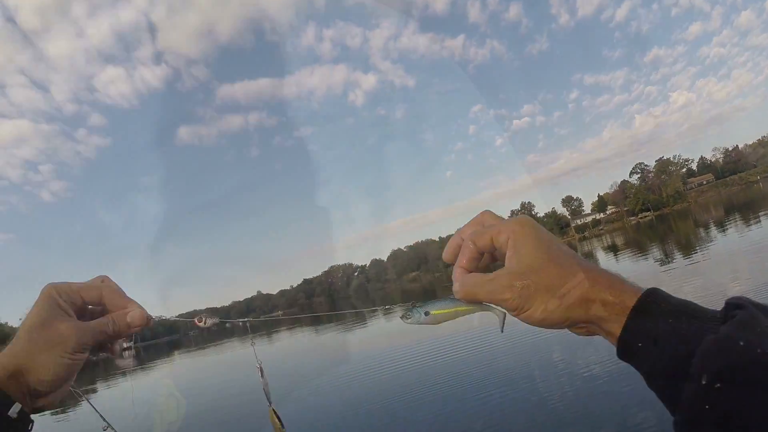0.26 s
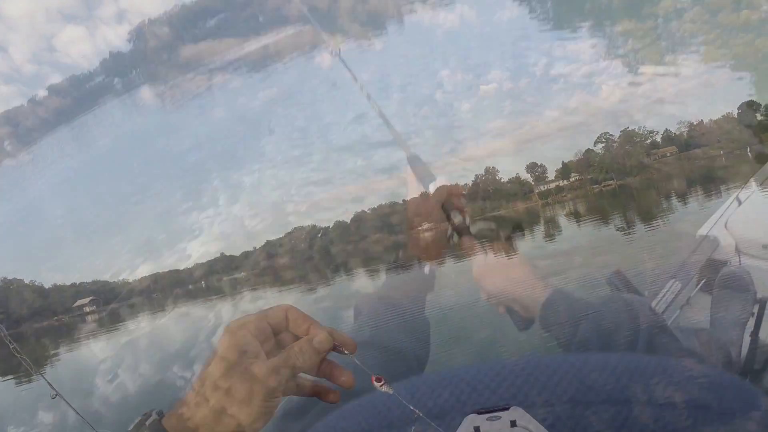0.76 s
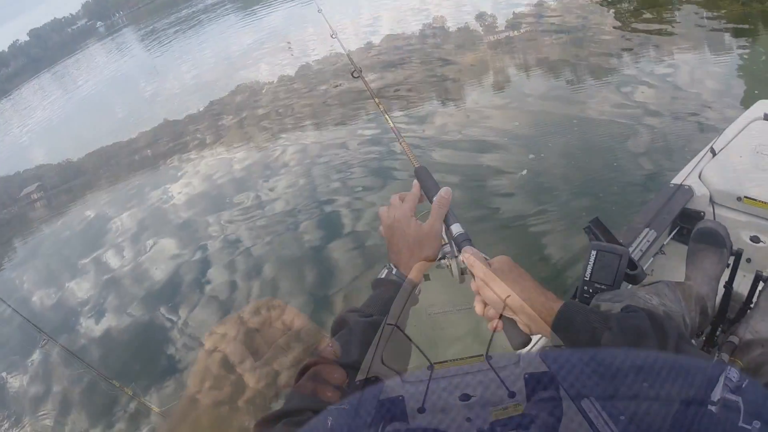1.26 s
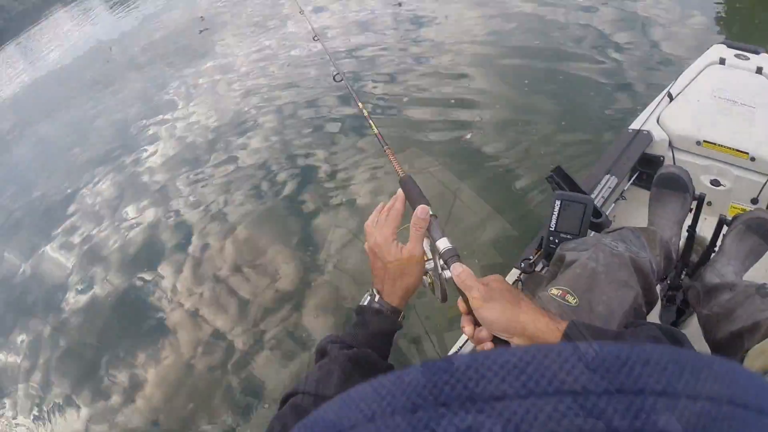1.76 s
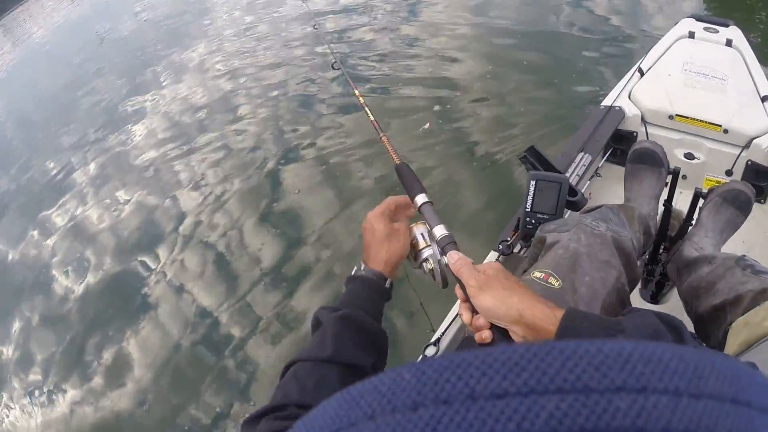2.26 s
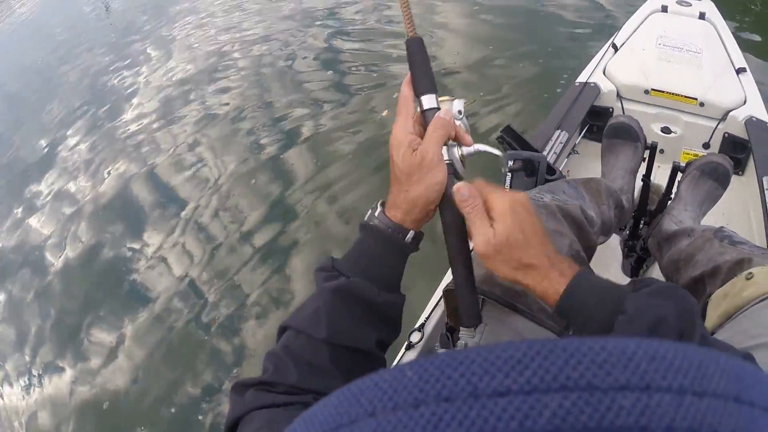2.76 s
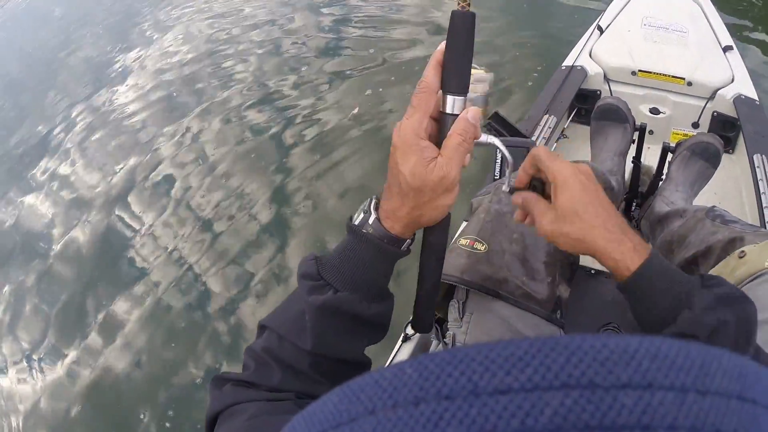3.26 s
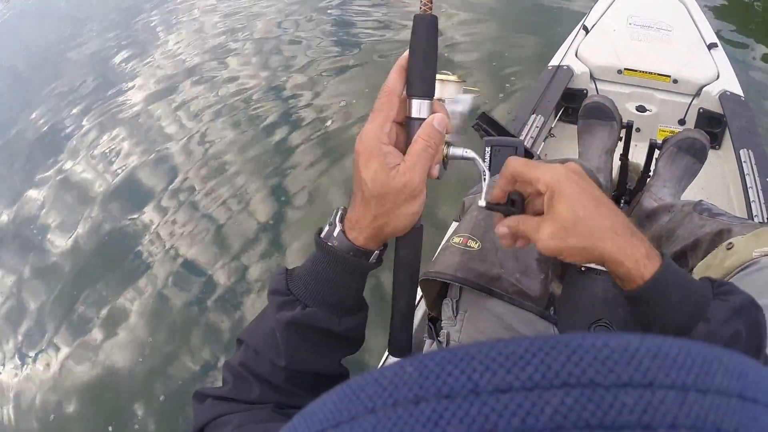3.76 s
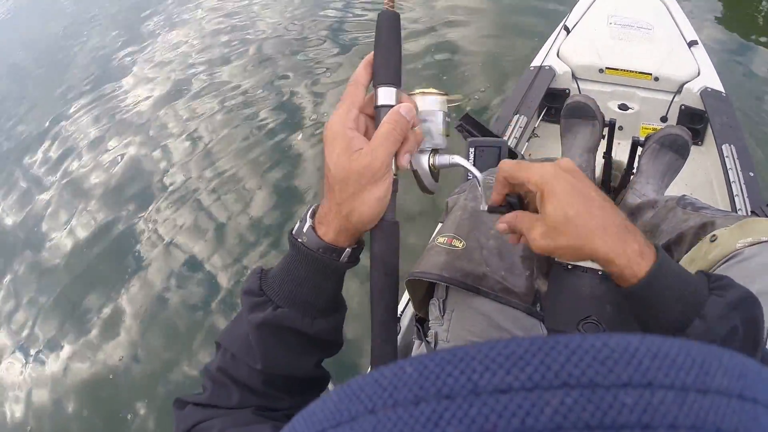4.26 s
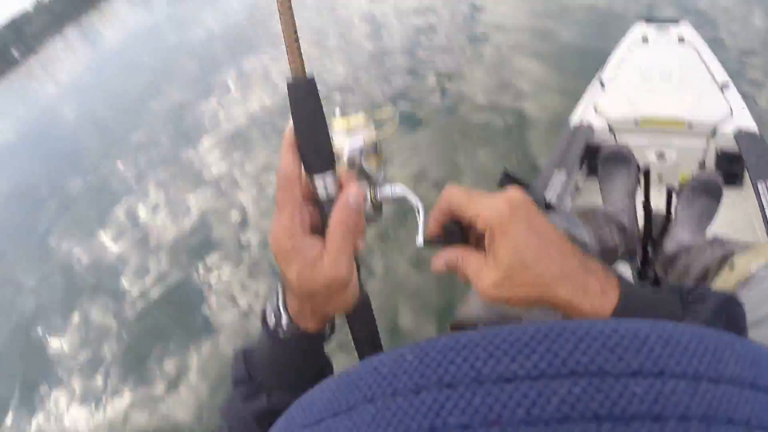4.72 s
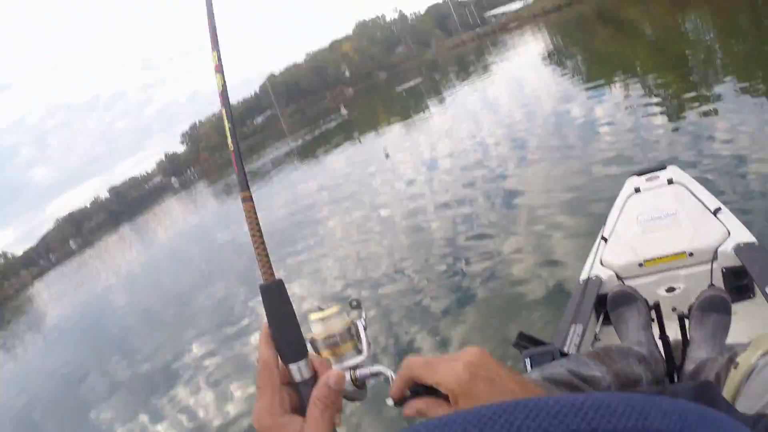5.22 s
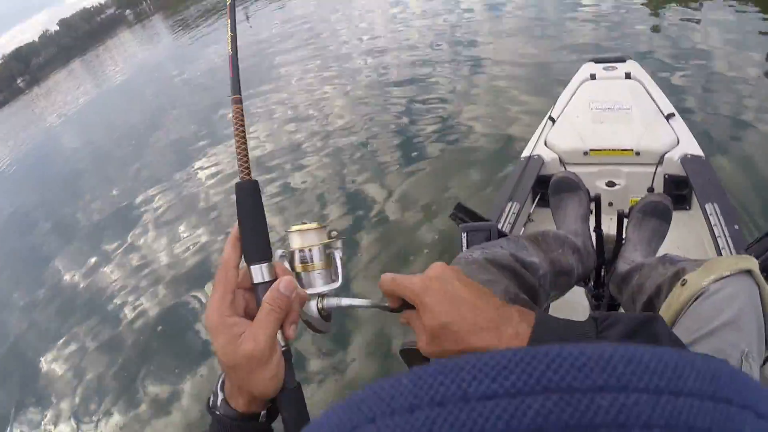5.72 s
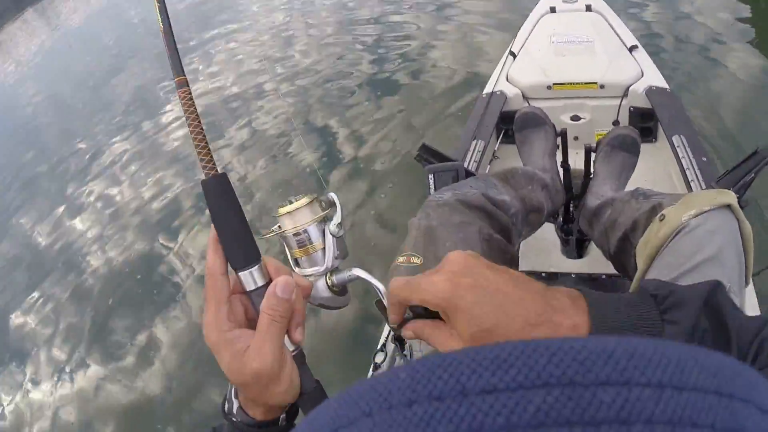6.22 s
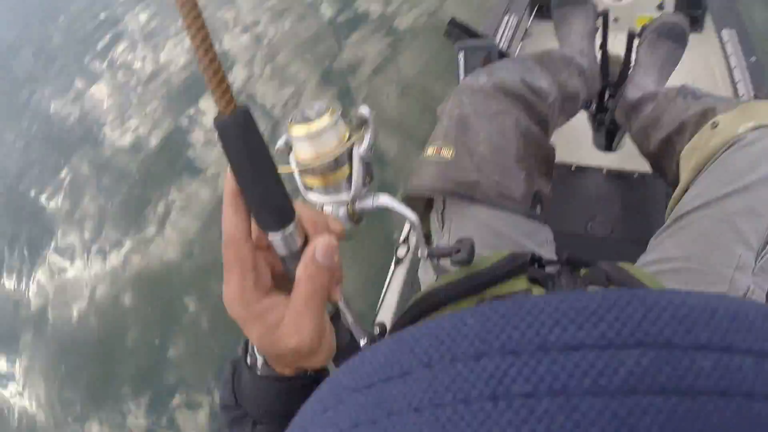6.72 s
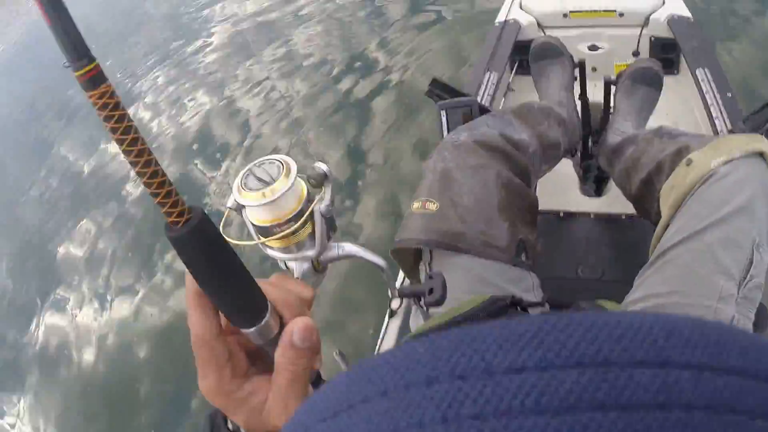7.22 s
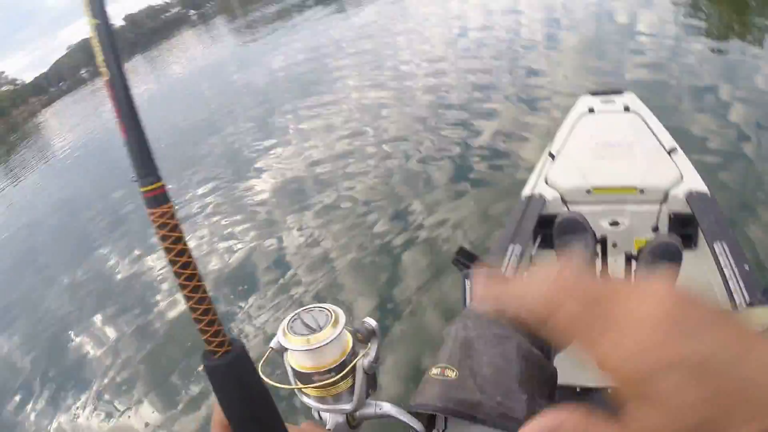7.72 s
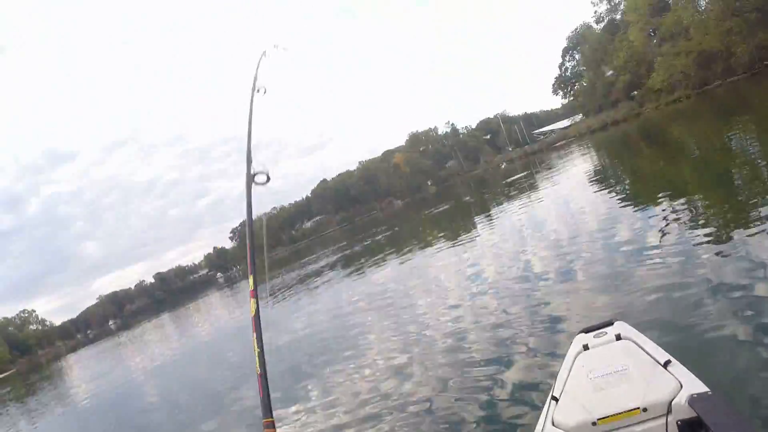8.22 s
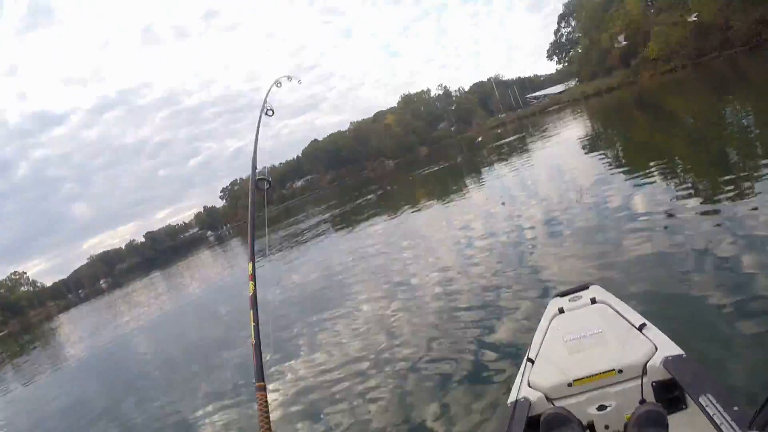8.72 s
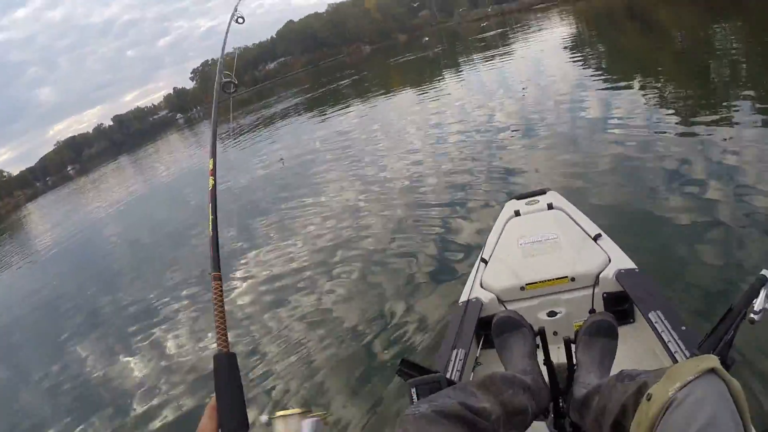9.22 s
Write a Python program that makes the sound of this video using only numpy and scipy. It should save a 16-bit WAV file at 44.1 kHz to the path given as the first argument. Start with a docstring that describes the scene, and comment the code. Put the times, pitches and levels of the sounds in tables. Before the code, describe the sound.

Calm open water, heard from a body-worn, enclosed microphone with low steady hiss. Distant birds whistle and peep with a slight echo from the banks, while a cricket trills and a katydid rasps in bouts. Close plastic knocks come sparsely, then in a short cluster, then as a violent burst of bumps, scrapes and deep membrane thuds. The hiss briefly dips, and faint taps and birds continue.

```python
"""An angler's chest camera in its plastic housing, on a kayak: a cricket, pulsed tone, trills over hiss throughout.
A katydid, gated noise, rasps in three bouts from the start; far birds, gliding tones, whistle from 0.5 s on.
Early knocks ring the housing, one hard at 1.6 s; thin ticks and a nasal call follow, then knocks near 4.9 s.
From 6.6 to 7.7 s strap, jacket and hand clatter, rub and squeak on it, and jolts push the microphone membrane.
The hiss dips just after; lighter knocks and rubs, birds and the katydid go on to the end."""
import sys
import numpy as np
from scipy import signal
from scipy.fft import rfft, irfft
from scipy.io import wavfile

SR = 44100
rng = np.random.default_rng(int(sys.argv[2]) if len(sys.argv) > 2 else 0)


def bounce(signal):
    """Save signal as a 16-bit WAV file at the path given by the first command-line argument."""
    frames = np.transpose(np.atleast_2d(signal))
    limited = np.clip(frames, -1, 1)
    pcm = np.round(limited * 32767).astype(np.int16)
    wavfile.write(sys.argv[1], SR, pcm)


N = 418068   # length in samples

# how loud the steady sounds are over time: t/s, hiss level/dB, body rumble level/dB, cloth rustle level/dB
BACKGROUND_LEVELS = [(0.0, -59.5, -75, -102), (0.45, -60, -49.5, -66.5), (0.84, -63, -81.5, -71.5),
                     (1.63, -67.5, -72, -77.5), (4.36, -68, -73, -81.5), (4.94, -65.5, -54.5, -75.5),
                     (5.28, -66.5, -65, -68.5), (6.28, -66.5, -66.5, -74), (6.62, -64.5, -60.5, -63.5),
                     (6.76, -61.5, -42, -59.5), (7.44, -68, -48.5, -68.5), (7.71, -77, -71.5, -85.5),
                     (8.29, -65.5, -68.5, -69.5), (9.48, -67, -69, -74)]
# tone colour of the hiss: f/Hz, relative level/dB
HISS_COLOUR = [(12, -33.5), (20, -4), (161, -4), (404, -9.5), (465, -11), (985, -15), (4430, -22.5),
               (7310, -26), (7950, -26), (8880, -29), (13900, -36), (15500, -62)]
# ringing pitches (modes) of the housing: f/Hz, relative level/dB, time to fade by 60 dB/s
HOUSING_MODES = [(740, -21.5, 0.0073), (1300, -6.5, 0.004), (1456, 5, 0.012), (1643, -7.5, 0.024),
                 (2000, 4.5, 0.0057), (2350, -4, 0.016), (2582, 0.5, 0.012), (3316, 6.5, 0.0042),
                 (3700, -2.5, 0.0093), (4900, -8, 0.0071)]
# knocks on the housing: t/s, peak level of the ring/dB, favoured f/Hz
KNOCK_LIST = [(0.401, -35, 1280), (0.409, -33.5, 1470), (.4215, -50, 2580), (0.429, -40.5, 3430),
              (0.441, -37.5, 2470), (0.5356, -48, 1450), (0.543, -41, 1260), (.553, -49, 1400),
              (.748, -56, 2600), (0.853, -48.5, 1600), (1.585, -29, 1290), (1.6076, -15.5, 2370),
              (2.0158, -49.5, 1460), (2.4904, -34, 1620), (2.5182, -43, 2480), (4.5222, -49, 1130),
              (4.8594, -19.5, 1340), (4.871, -29, 2440), (4.879, -20.5, 2460), (4.89, -20, 1720),
              (4.905, -32, 1430), (5.5081, -42, 2450), (5.5804, -36.5, 2500), (5.5992, -47.5, 1550),
              (6.0558, -39.5, 2540), (6.322, -50, 3200), (6.6032, -15, 1550), (6.629, -17.5, 3150),
              (6.6405, -14.5, 2090), (6.67, -15, 1840), (6.6764, -15.5, 2670), (6.711, -23, 1920),
              (6.7563, -11.5, 1497), (6.762, -13, 1550), (6.791, -19, 2500), (6.8113, -29, 1930),
              (6.8718, -34.5, 2320), (6.8812, -38.5, 2080), (6.959, -29, 2200), (7.045, -43.5, 2630),
              (7.1598, -19.5, 1310), (7.22, -14.5, 4170), (7.2632, -7, 1930), (7.465, -29, 1920),
              (7.5008, -40.5, 1740), (7.612, -24.5, 1534), (7.6294, -18, 2440), (7.6431, -30.5, 1450),
              (7.9763, -34, 1420), (7.994, -36, 2060), (8.019, -31.5, 2530), (8.0406, -41, 2010),
              (8.1588, -43, 1420), (8.1772, -46.5, 1480), (8.396, -41.5, 1400), (8.4082, -39, 1540),
              (8.613, -45, 2000), (8.6463, -41.5, 1420), (8.7223, -46, 1505), (8.7546, -42.5, 2020),
              (8.989, -52, 2100), (9.238, -53, 2600), (9.3921, -38.5, 2430)]
# rubs along the housing: t/s, length/s, rms level of the ring/dB, treble hiss level relative to it/dB
RUB_LIST = [(0.461, 0.064, -56, -19), (1.576, 0.025, -47.5, -7.5), (4.745, 0.063, -60.5, -33),
            (4.877, 0.048, -42.5, -20), (4.924, 0.049, -41, -16.5), (4.971, 0.06, -58.5, -13),
            (5.153, 0.056, -65.5, -23), (5.32, 0.075, -59.5, -8.5), (5.684, 0.077, -63.5, -21),
            (6.599, 0.048, -34.5, -5), (6.645, 0.039, -31.5, -7.5), (6.666, 0.028, -27, -5.5),
            (6.687, 0.071, -34.5, -3), (6.748, 0.026, -33.5, 0.5), (6.804, 0.028, -43, -6),
            (7.063, 0.1, -49.5, -5), (7.178, 0.028, -35.5, -8), (7.202, 0.048, -31, -4.5),
            (7.261, 0.073, -57.5, -13.5), (7.337, 0.063, -53, -10.5), (7.397, 0.046, -47, -13),
            (7.501, 0.044, -54.5, -12.5), (7.598, 0.042, -55, -7.5), (7.628, 0.025, -41.5, -2),
            (8.006, 0.11, -58.5, -15), (8.602, 0.1, -60, -28), (8.843, 0.081, -65.5, -16),
            (9.14, .11, -66.5, -14)]
# jolts that push the membrane: t/s, peak level of the swing/dB, swing f/Hz,
# fade length/swings (a larger number lasts longer)
JOLT_LIST = [(0.079, -40.5, 87, 2.5), (0.463, -54, 59, 11), (1.586, -37, 108, 1.5),
             (1.605, -28.5, 113, 4.5), (4.521, -36.5, 205, 4), (4.861, -31, 223, 3.5),
             (4.901, -29.5, 211, 8), (4.909, -37, 111, 12.5), (4.949, -32.5, 33.7, 3.5),
             (6.058, -43.5, 161, 2), (6.603, -19, 65.4, 2.1), (6.621, -27, 51, 2.1), (6.669, -18, 97.4, 5),
             (6.683, -18.5, 72, 3), (6.702, -29.5, 50, 3), (6.794, -9.5, 85, 2), (6.811, -16, 69, 2.5),
             (6.824, -19, 161, 1.4), (6.87, -33.5, 33.3, 3), (7.016, -29.5, 23.2, 1.3),
             (7.064, -41.5, 51, 5.5), (7.158, -46, 196, 11), (7.18, -33, 88, 5.5), (7.19, -26.5, 245, 4.5),
             (7.225, -31.5, 211, 10), (7.261, -15, 99.5, 2.5), (7.359, -37.5, 40.6, 1.5),
             (7.466, -42, 203, 2.5), (7.633, -31.5, 25.2, 2.3), (7.975, -45, 193, 4), (8.4, -48.5, 151, 5)]
# short flat bird peeps: t/s, length/s, level of the lower partial/dB
PEEP_LIST = [(1.016, 0.074, -66), (2.601, 0.086, -67.5), (3.302, 0.078, -67), (6.954, 0.064, -73),
             (7.65, 0.045, -75)]
# thin bright ticks from rod and reel: t/s, peak level/dB
TICK_LIST = [(2.3278, -42), (3.5063, -44.5), (5.5076, -50.5), (5.9107, -50.5)]
# squeaks of the strap on the housing: t/s, length/s, middle f/Hz, width/Hz, rms level before the swell/dB
SQUEAK_LIST = [(7.197, .05, 3890, 152, -27), (7.2, .05, 750, 61.7, -33)]
# bird whistles: t/s, length/s, first f/Hz, middle f/Hz, last f/Hz,
# first level/dB, last level/dB, level of the octave above relative to the tone/dB
WHISTLE_LIST = [ (.51, 0.094, 3310, 3190, 3370, -76, -66, -25),
                (.602, 0.1, 4000, 4120, 4140, -69, -72, -27), (.71, 0.073, 3330, 3200, 3060, -69, -65, -27),
                (2.11, 0.16, 3780, 4130, 3930, -70, -65.5, -27),
                (2.264, 0.03, 3230, 3500, 3280, -66, -63, -27),
                (2.286, 0.04, 3310, 3170, 3250, -56, -67, -21),
                (2.31, 0.12, 3260, 3380, 3250, -69, -70, -10),
                (2.36, 0.046, 5330, 5530, 5530, -62, -64, -19),
                (2.4, 0.031, 4960, 4720, 4480, -58, -50.5, -31),
                (2.42, 0.046, 4570, 4530, 4230, -55.5, -62, -27),
                (2.34, .025, 4200, 4350, 4500, -58, -60, -27), (2.46, .032, 3210, 3100, 2960, -69, -70, 0),
                (2.505, 0.078, 3170, 3070, 3280, -70, -75, -1.5),
                (2.568, 0.027, 3420, 3190, 3130, -65, -63, -2),
                (2.59, 0.041, 3330, 3260, 3050, -69, -67, -3),
                (2.58, 0.06, 2380, 2320, 2200, -69, -72, -27),
                (2.74, 0.021, 4060, 4400, 4530, -57, -66, -16),
                (2.755, 0.13, 4940, 5260, 5070, -57, -90, -6),
                (2.865, 0.16, 5040, 4920, 4720, -61.5, -65.5, -13),
                (3.69, 0.17, 4164, 4380, 4400, -69, -68.5, -28),
                (3.85, 0.31, 4400, 4560, 4250, -73.5, -82, -27),
                (4.585, 0.27, 4070, 4026, 3930, -59.5, -73, -14),
                (4.78, 0.097, 2010, 2120, 2160, -69, -66, -27),
                (4.99, 0.27, 4230, 4365, 4010, -62, -77.5, -25),
                (5.92, 0.047, 2636, 2670, 2730, -66, -61, -33),
                (6.03, .16, 4200, 4400, 4500, -83, -77, -27), (6.09, 0.28, 3460, 3320, 3130, -87, -76, -29),
                (6.28, 0.17, 1870, 1846, 1780, -78, -72.5, -25),
                (6.44, 0.04, 1830, 1780, 1790, -69, -72.5, -27),
                (6.425, 0.11, 1150, 1424, 1310, -76, -78, 12.5),
                (6.432, .05, 2840, 2970, 3250, -60.5, -72.5, -27),
                (6.83, .24, 4330, 4350, 4580, -80, -76, 1), (7.65, 0.25, 4090, 4000, 3830, -70, -78, -12),
                (7.89, 0.21, 4060, 4220, 4000, -76, -78, -25.5),
                (8.12, .09, 4100, 4000, 3980, -69, -69, -29.5),
                (8.21, 0.14, 4030, 4130, 3940, -69.5, -73.5, -28),
                (8.858, 0.098, 3880, 4120, 4050, -64, -76, -21),
                (8.94, 0.089, 4000, 3990, 4030, -69, -68, -21),
                (9.02, 0.28, 4004, 4070, 3910, -57, -70.5, -21),
                (8.94, .17, 6400, 6320, 6200, -83, -76, -28),
                (9.42, 0.054, 4450, 4620, 4710, -83, -74, -27)]
# nasal bird call: t/s, length/s, first, middle and last base f/Hz, level at the throat resonance/dB
NASAL_NOTES = [(3.551, .065, 533, 592, 530, -65.5), (3.63, .045, 577, 560, 535, -73)]
# pairs of katydid rasps: first rasp t/s, wait until the second begins/s
RASP_PAIRS = [(0, .093), (.272, .118), (.561, .153), (.814, .2), (1.172, .185), (1.436, .154),
              (1.733, .162), (1.999, .167), (2.289, .144), (4.135, .089), (4.389, .113), (4.671, .129),
              (5.106, .072), (5.341, .133), (5.654, .095), (5.92, .131), (6.19, .185), (6.47, .1),
              (8.445, .115), (8.686, .172), (8.965, .155), (9.226, .164)]

RASP_S, RASP_DB, TEETH_PER_S = 0.043, -74, 120   # the level is that of the noise before the gate
CRICKET_HZ, CRICKET_DB, PULSES_PER_S = 7700, -83.5, 58
PEEP_BASE_HZ, PEEP_TOP_DB = 3290, -9   # base pitch itself is silent; third partial relative to second
NASAL_PEAK_HZ, NASAL_DB_PER_OCTAVE = 2830, 25   # throat resonance and how fast partials weaken away from it
WAVER = .003   # random spread of a bird's pitch, as a fraction
ECHO_T60_S, ECHO_DB = .75, -7.5   # haze of echoes from the banks: time to fade by 60 dB, level
ROUGHNESS = 1.8   # share of noise in a contact
GRIP_DB, SLIP_SPREAD_DB = 3.0, 3.6   # scatter of mode strengths, scatter of slip sizes
RUB_HZ = 2150   # pitch that rubbing favours
CUTOFF_HZ = 15700   # everything above is at least 70 dB down


def from_db(db):
    """Turn decibels into a plain factor."""
    return 10 ** (np.asarray(db) / 20)


def rms_one(x):
    """Scale a sound to an rms level of 1."""
    return x / np.sqrt(np.mean(x ** 2) + 1e-20)


def band(x, low_hz, high_hz):
    """Keep mainly the pitches between two limits."""
    return signal.sosfilt(signal.butter(2, [low_hz, high_hz], "band", fs=SR, output="sos"), x)


def add(out, s, sound):
    """Mix a short sound in at time s."""
    i = max(round(s * SR), 0)
    out[i:i + len(sound)] += sound[:N - i]


def seconds(length):
    """Time steps, in seconds, of a sound of this length."""
    return np.arange(round(length * SR)) / SR


def drift(rate_hz):
    """Slow random wandering with a spread of 1, made by smoothing noise."""
    r = np.exp(-2 * np.pi * rate_hz / SR)
    smooth = signal.lfilter([1], [1, -2 * r, r * r], rng.standard_normal(N + SR))
    return rms_one(smooth[SR:])   # drop the first second, while the filter settles


def grains(per_s, spread_db):
    """Stick-slip: clicks of uneven size and either sign at random moments."""
    size_db = spread_db * np.minimum(rng.exponential(1, N), 4)
    sizes = from_db(size_db) * rng.choice([-1, 1], N)
    return sizes * (rng.random(N) < per_s / SR)


def housing_ring(favoured_hz, focus_db_per_octave, draw):
    """Ring of the housing after one click; contact place favours a pitch, grip shifts and weights the modes."""
    t = seconds(.03)
    hz, level_db, t60 = np.transpose(HOUSING_MODES)[:, :, None]
    strength, shift = np.reshape(draw, (2, -1, 1))
    distance_octaves = np.abs(np.log2(hz / favoured_hz))
    gain = from_db(level_db + GRIP_DB * strength - focus_db_per_octave * distance_octaves)
    hz = hz * (1 + 0.03 * shift)
    signs = (-1) ** np.arange(len(HOUSING_MODES))[:, None]   # neighbouring modes swing against each other
    return np.sum(signs * gain * from_db(-60 * t / t60) * np.sin(2 * np.pi * hz * t), axis=0)


def microphone_hiss():
    """Steady noise, shaped pitch by pitch to the hiss colour."""
    hz = np.maximum(np.arange(N // 2 + 1) * SR / N, 10)
    colour_hz, colour_db = np.transpose(HISS_COLOUR)
    colour = from_db(np.interp(np.log(hz), np.log(colour_hz), colour_db))
    return rms_one(irfft(rfft(rng.standard_normal(N)) * colour, N))


def body_rumble():
    """Very low noise carried through the body, swelling at random."""
    return rms_one(band(rng.standard_normal(N), 4.1, 40)) * from_db(1.9 * drift(8))


def cloth_rustle():
    """Random slips of cloth brushing the housing make it ring, in short strokes."""
    ring = housing_ring(1900, 5.3, np.zeros(2 * len(HOUSING_MODES)))
    cloth = signal.fftconvolve(grains(1000, 3.7), ring)[:N]
    return rms_one(cloth) * from_db(3.4 * drift(9.9))


def background():
    """Hiss, rumble and rustle, each following its level over time."""
    s, *columns = np.transpose(BACKGROUND_LEVELS)
    hiss_db, rumble_db, rustle_db = [np.interp(np.arange(N) / SR, s, c) for c in columns]
    hiss = from_db(hiss_db) * microphone_hiss()
    rumble = from_db(rumble_db) * body_rumble()
    return hiss + rumble + from_db(rustle_db) * cloth_rustle()


def cricket():
    """A narrow tone pulsed steadily, its pitch and level wandering a little."""
    t = np.arange(N) / SR
    pulses = 1 + 0.51 * np.sin(2 * np.pi * PULSES_PER_S * t + 1.0 * drift(1.4))
    tone = np.sin(2 * np.pi * CRICKET_HZ * t + 1.2 * drift(15))
    return from_db(CRICKET_DB) * pulses * tone * from_db(1.3 * drift(4.3))


def katydid():
    """Treble noise opened and closed tooth by tooth, in pairs of rasps."""
    gate, t = np.zeros(N), seconds(RASP_S)
    teeth = 1 - 0.71 * np.cos(2 * np.pi * TEETH_PER_S * t)
    edges = np.clip(np.minimum(t, RASP_S - t) / 0.0056, 0, 1)
    for first, wait in RASP_PAIRS:
        add(gate, first, teeth * edges)
        add(gate, first + wait, teeth * edges)
    return from_db(RASP_DB) * gate * rms_one(band(rng.standard_normal(N), 6840, 9300))


def arc(length, first_hz, middle_hz, last_hz, attack_s=0.0045, release_s=0.011):
    """Phase and edges of a note whose pitch is a parabola through three values, wavering slightly."""
    t = seconds(length)
    u = 2 * t / length - 1   # runs from -1 to 1
    slope = (last_hz - first_hz) / 2
    bend = (first_hz + last_hz) / 2 - middle_hz
    hz = middle_hz + slope * u + bend * u ** 2
    hz = hz * (1 + WAVER * np.interp(t, np.arange(40) / 70, rng.standard_normal(40)))
    edges = np.clip(np.minimum(t / attack_s, (length - t) / release_s), 0, 1)
    return 2 * np.pi * np.cumsum(hz) / SR, edges


def whistles():
    """A tone and its octave glide along an arc while the level fades or swells evenly in decibels."""
    out = np.zeros(N)
    for s, length, first_hz, middle_hz, last_hz, first_db, last_db, octave_db in WHISTLE_LIST:
        phase, edges = arc(length, first_hz, middle_hz, last_hz)
        tone = np.sin(phase) + from_db(octave_db) * np.sin(2 * phase)
        level = np.sqrt(2) * from_db(np.linspace(first_db, last_db, len(tone)))   # rms of the tone to peak
        add(out, s, level * edges * tone)
    return out


def nasal_call():
    """A stack of partials on a low arc, strongest near the throat resonance."""
    out, k = np.zeros(N), np.arange(3, 12)[:, None]   # partials 3 to 11
    for s, length, first_hz, middle_hz, last_hz, level_db in NASAL_NOTES:
        phase, edges = arc(length, first_hz, middle_hz, last_hz)
        distance_octaves = np.abs(np.log2(k * middle_hz / NASAL_PEAK_HZ))
        gain = from_db(level_db - NASAL_DB_PER_OCTAVE * distance_octaves)
        add(out, s, edges * np.sum(gain * np.sin(k * phase), axis=0))
    return out


def peeps():
    """Short flat notes made of the second and third partial of one pitch."""
    out = np.zeros(N)
    for s, length, level_db in PEEP_LIST:
        t = seconds(length)
        phase = 2 * np.pi * PEEP_BASE_HZ * t
        edges = np.clip(np.minimum(t, length - t) / 0.0053, 0, 1)
        tone = np.sin(2 * phase) + from_db(PEEP_TOP_DB) * np.sin(3 * phase)
        add(out, s, from_db(level_db) * edges * tone)
    return out


def birds():
    """All calls waver in level over the distance and trail a haze of echoes."""
    calls = whistles() + nasal_call() + peeps()
    t = seconds(.6)
    echoes = rng.standard_normal(len(t)) * from_db(-60 * t / ECHO_T60_S)
    haze = signal.fftconvolve(calls, echoes / np.linalg.norm(echoes))[:N]
    return calls * from_db(1.86 * drift(7.7)) + from_db(ECHO_DB) * haze


def ticks():
    """Thin bright ticks from rod and reel: bursts of treble noise that die within milliseconds."""
    out, t = np.zeros(N), seconds(.012)
    for s, peak_db in TICK_LIST:
        tick = band(rng.standard_normal(len(t)) * np.exp(-t / 0.0031), 2000, 9400)
        add(out, s, from_db(peak_db) * tick / np.abs(tick).max())
    return out


def squeaks():
    """The strap's uneven slips lock to one narrow resonance: narrow noise that swells and fades."""
    out = np.zeros(N)
    for s, length, hz, width, level_db in SQUEAK_LIST:
        t = seconds(length)
        tone = rms_one(band(rng.standard_normal(len(t)), hz - width / 2, hz + width / 2))
        add(out, s, from_db(level_db) * tone * np.sqrt(np.sin(np.pi * t / length)))
    return out


def jolts(thud_hz=320, thud_db=-3):
    """The membrane is pushed in, swings and settles; the quicker the swing, the louder a housing thud."""
    out, t = np.zeros(N), seconds(0.12)
    thud = from_db(thud_db - 60 * t / 0.039) * np.sin(2 * np.pi * thud_hz * t)
    for s, peak_db, hz, swings in JOLT_LIST:
        swell = t * hz * from_db(-60 * t * hz / swings)
        wave = swell ** 1.7 * np.sin(2 * np.pi * hz * t)   # the power also shortens the fade
        push = wave / np.abs(wave).max() + thud * hz / thud_hz
        add(out, s, -from_db(peak_db) * push)   # minus: pushed in first
    return out


def rubs(edge_s=0.011):
    """Dense slips under each stroke ring the housing and hiss in the treble."""
    out = np.zeros(N)
    slips = grains(5000, SLIP_SPREAD_DB) * from_db(4.3 * drift(57))
    draws = rng.standard_normal((len(RUB_LIST), 2 * len(HOUSING_MODES)))
    for (s, length, level_db, hiss_db), draw in zip(RUB_LIST, draws):
        t, i = seconds(length), round(s * SR)
        edges = np.clip(np.minimum(t / edge_s, (length - t) / 0.02), 0, 1)
        stroke = slips[i:i + len(t)] * edges
        body = signal.fftconvolve(stroke, housing_ring(RUB_HZ, 12.0, .5 * draw))
        add(out, s, from_db(level_db) * body / np.std(body[:len(t)]))
        softened = signal.lfilter([1], [1, -.75], stroke)
        add(out, s, from_db(level_db + hiss_db) * rms_one(band(softened, 3500, 9300)))
    return out


def knocks(contact_s=0.0007, focus_db_per_octave=10.0, crack_db=-7, snap_db=-27, tail_db=-20):
    """A brief rough, springy contact rings the housing, with a broad crack, a treble snap and a rattling tail."""
    out, t, after = np.zeros(N), seconds(.012), seconds(.05)
    draws = rng.standard_normal((len(KNOCK_LIST), len(t) + 2 * len(HOUSING_MODES)))
    push = t * np.exp(-t / contact_s)
    for (s, peak_db, hz), draw in zip(KNOCK_LIST, draws):
        rough = draw[:len(t)] * push
        contact = push * np.sin(2 * np.pi * hz * t) + ROUGHNESS * rough
        body = np.convolve(contact, housing_ring(hz, focus_db_per_octave, draw[len(t):]))
        crack = band(band(rough, 900, 3500), 720, 4100)
        snap = band(band(rough, 4500, 11000), 3500, 13000)
        tail = band(rng.standard_normal(len(after)), 900, 3200) * from_db(-60 * after / 0.081)
        for part, part_db in (body, 0), (crack, crack_db), (snap, snap_db), (tail, tail_db):
            add(out, s, from_db(peak_db + part_db) * part / np.abs(part).max())
    return out


def scene():
    """Everything reaches one microphone."""
    nature = background() + cricket() + katydid() + birds()
    handling = ticks() + squeaks() + jolts() + rubs() + knocks()
    return (nature + handling)[None]


def record(dry):
    """The treble rolls off gently, then the top is cut."""
    dull = signal.sosfilt(signal.butter(1, 12000, fs=SR, output="sos"), dry)
    return signal.sosfilt(signal.cheby2(12, 70, CUTOFF_HZ, fs=SR, output="sos"), dull)


dry = scene()
out = record(dry)
bounce(out)
```